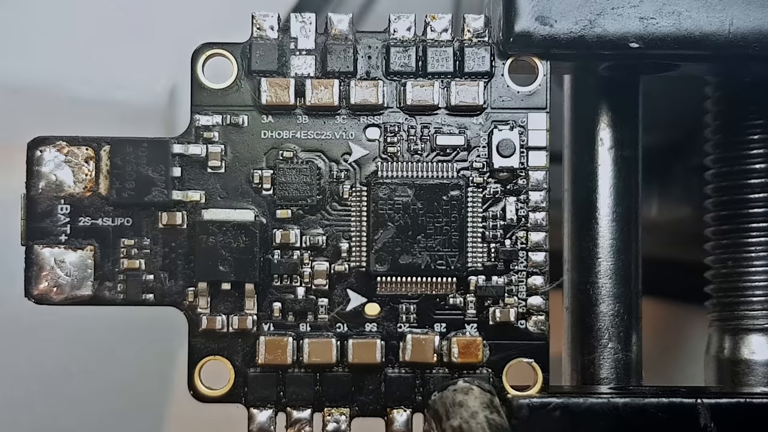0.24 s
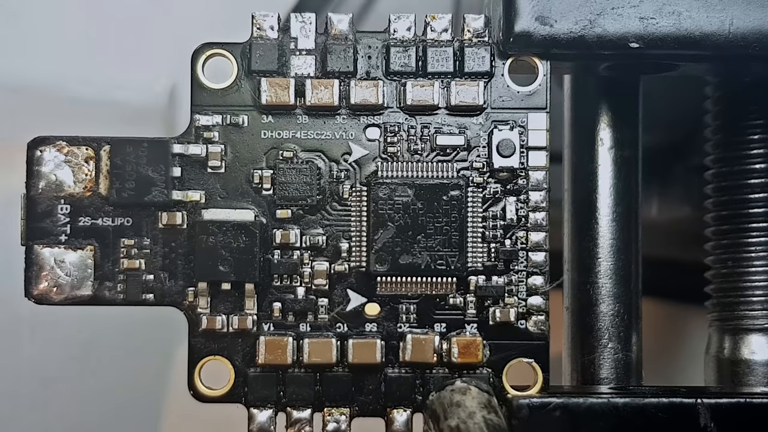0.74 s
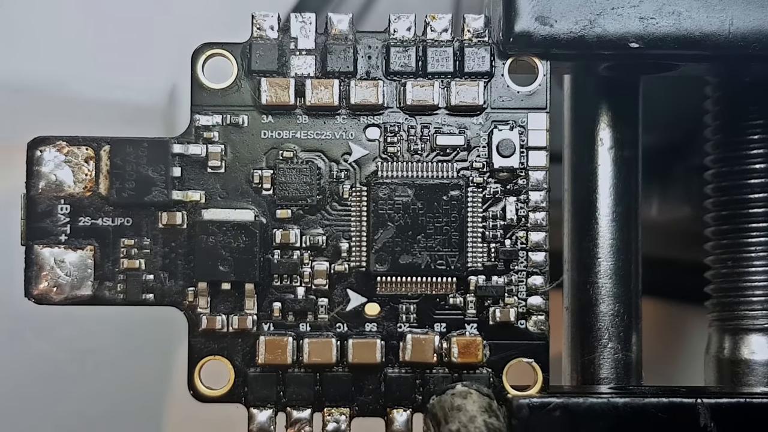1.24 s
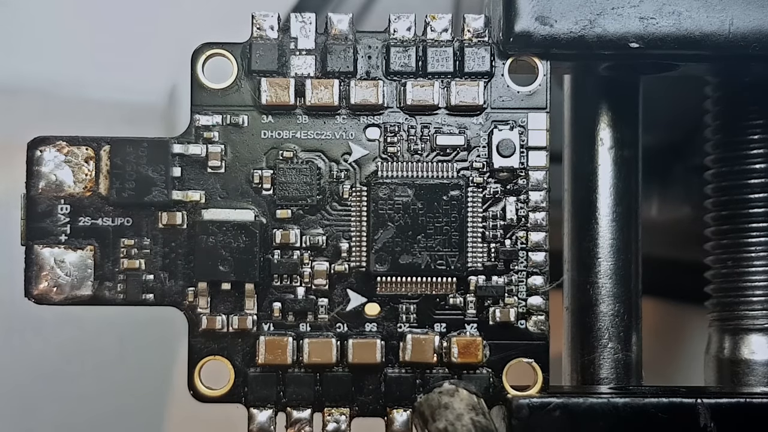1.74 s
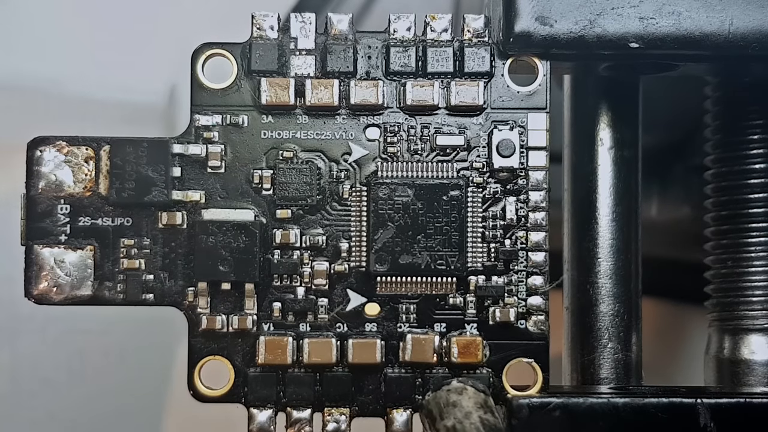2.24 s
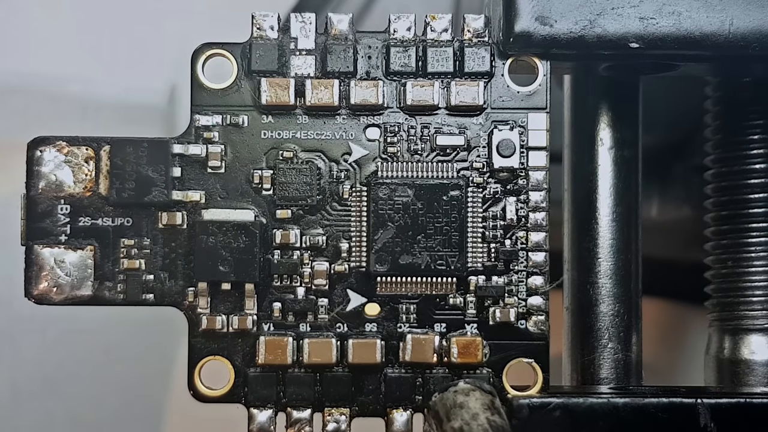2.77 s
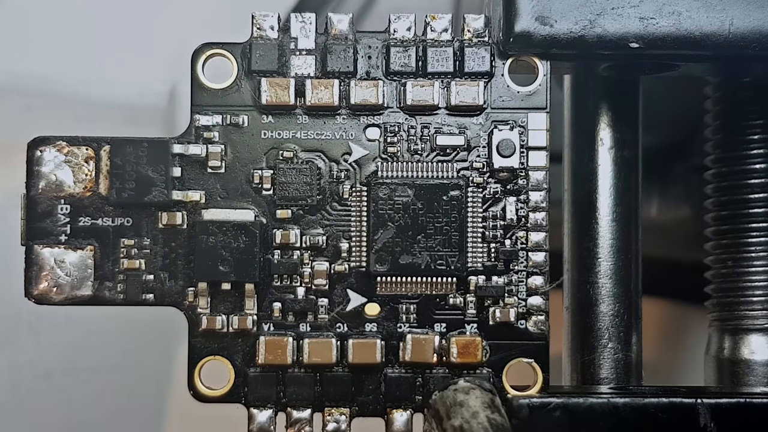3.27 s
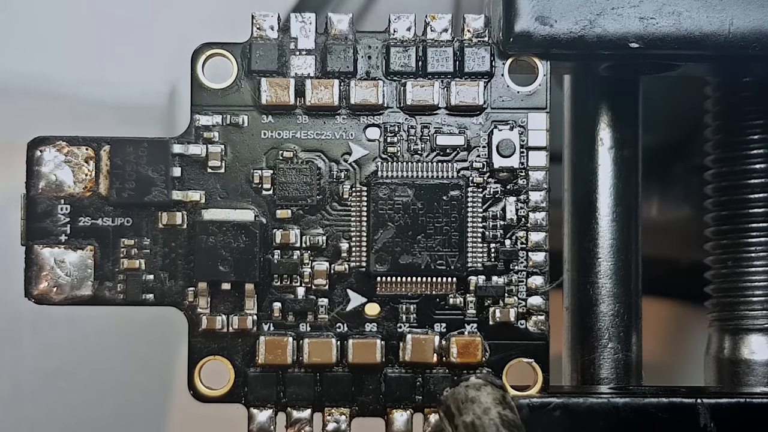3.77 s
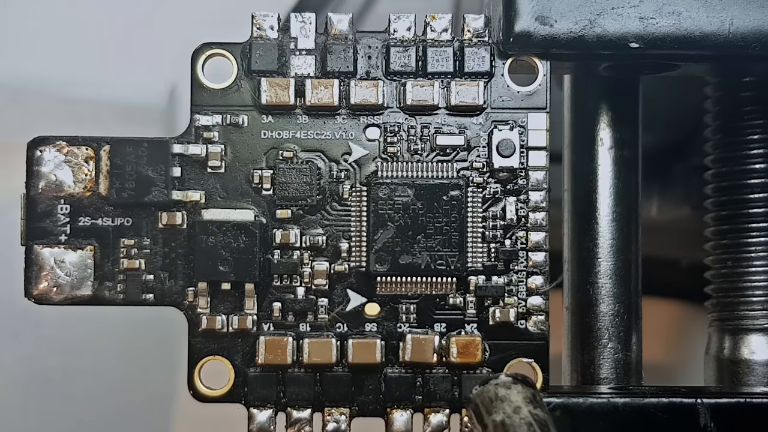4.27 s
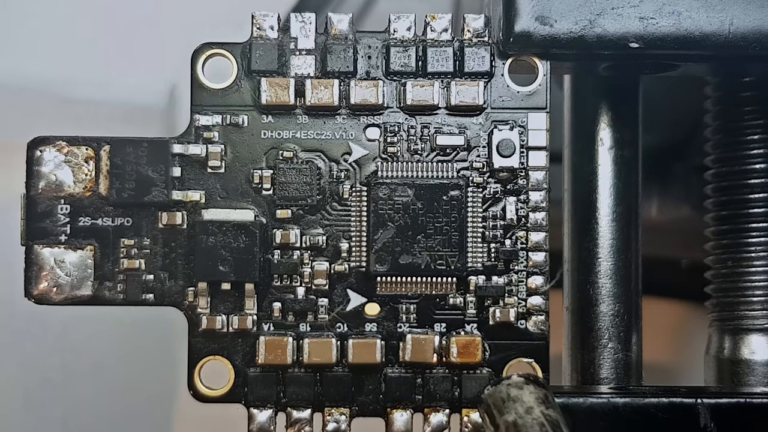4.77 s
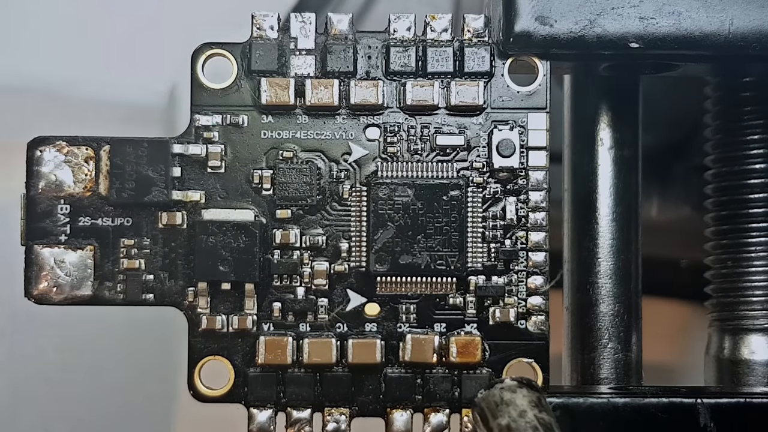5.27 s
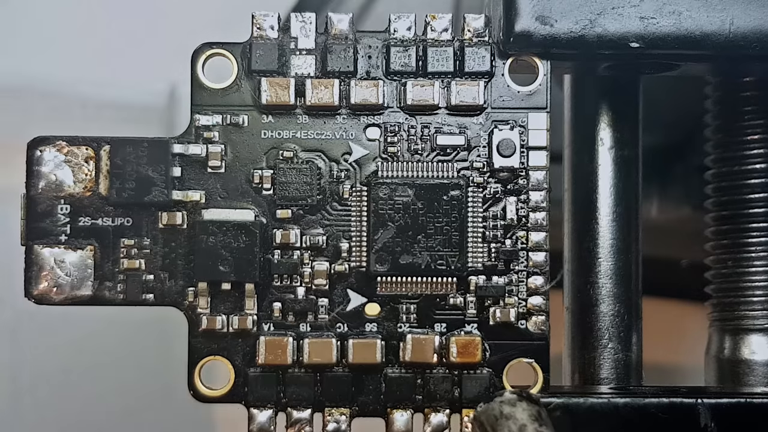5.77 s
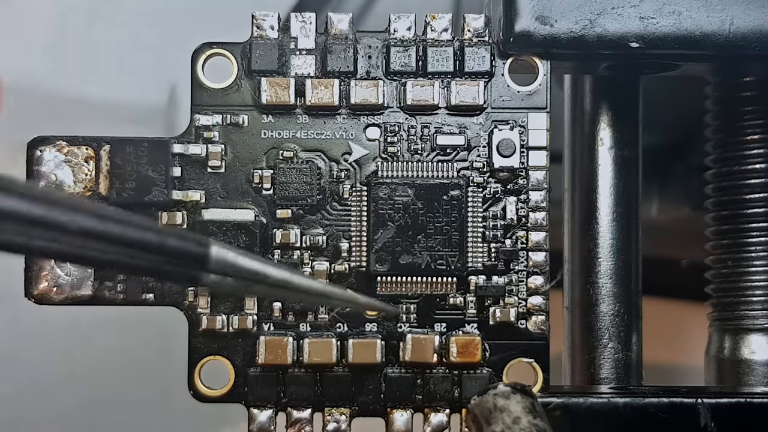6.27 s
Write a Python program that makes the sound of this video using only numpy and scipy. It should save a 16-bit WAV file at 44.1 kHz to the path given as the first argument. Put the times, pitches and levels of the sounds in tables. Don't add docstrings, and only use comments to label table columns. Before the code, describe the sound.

Close, continuous rush of hot air with a faint singing edge and low mains hum, drifting slightly, then a dull bench bump and brighter hiss.

```python
import sys
import numpy as np
from scipy import signal
from scipy.fft import rfft, irfft, next_fast_len
from scipy.io import wavfile
from scipy.ndimage import uniform_filter1d

SR = 44100
rng = np.random.default_rng(int(sys.argv[2]) if len(sys.argv) > 2 else 0)


def attenuation_scalar(level_db):
    decades = np.asarray(level_db, float) / 20
    return 10 ** decades


def master_out(mix):
    frames = np.transpose(np.atleast_2d(mix))
    ceiling = np.clip(frames, -1, 1)
    pcm = np.round(ceiling * 32767).astype(np.int16)
    wavfile.write(sys.argv[1], SR, pcm)


N = 287091
TIME = np.arange(N) / SR
SIZE = next_fast_len(N)
HZ = np.maximum(np.arange(SIZE // 2 + 1) * SR / SIZE, 1)
MAINS_HZ, STROKE_S = 49.963, -.00341


def walk(rate_hz):
    hold = int(SR / rate_hz)
    steps = np.repeat(rng.standard_normal(N // hold + 1), hold)
    slewed = uniform_filter1d(uniform_filter1d(steps, hold), hold)
    return 1.48 * slewed[:N]


def along(hz, values):
    return np.interp(np.log(HZ), np.log(hz), values)


def delay(ms):
    return np.exp(-2j * np.pi * HZ * ms / 1000)


# (t/s, ring f/Hz, peak level/dB, t60/s)
KNOCKS = [
    (5.825, 116, -33.5, 0.11),
]


def bump():
    out = np.zeros(N)
    for start_s, ring_hz, peak_db, t60_s in KNOCKS:
        age = np.maximum(TIME - start_s, 0)
        fade = np.log(1000) * age / t60_s
        envelope = fade * np.exp(1 - fade)
        out -= attenuation_scalar(peak_db) * np.sin(2 * np.pi * ring_hz * age) * envelope
    return out


# (multiple of mains, left level/dB, right level/dB, right lag/ms, sign)
PUMP_HUM = [(1, -62, -56, -2, 1), (2, -32.6, -32, .7, -1), (3, -37.7, -33.2, -.2, -1),
            (4, -42.5, -45.6, -.1, 1), (5, -56, -54, .7, 1), (6, -52, -53.5, .2, -1), (8, -61, -63, 0, 1),
            (13, -66, -60, -.45, 1), (16, -62, -53.5, -.27, 1)]


def hum():
    beat_hz, beat_top_s, beat_depth = .5, 3.2, .45
    lead_rad, sway_rad = .9, .3
    swell = np.cos(2 * np.pi * beat_hz * (TIME - beat_top_s))
    out = np.zeros((2, N))
    for multiple, left_db, right_db, lag_ms, sign in PUMP_HUM:
        lag_s = np.array([[0], [lag_ms / 1000]])
        beats = multiple == 4
        lead = beats * (lead_rad + sway_rad * swell)
        wave = np.cos(2 * np.pi * multiple * MAINS_HZ * (TIME - STROKE_S - lag_s) + lead)
        beat = 1 + beats * beat_depth * swell
        level_db = np.array([[left_db], [right_db]]) + 0.43 * walk(5.6)
        out += sign * np.sqrt(2) * attenuation_scalar(level_db) * beat * wave
    return out


# (f/Hz, share 0-1)
SHARED_HISS = [(25, .45), (40, .65), (80, .93), (400, .9), (1000, .8), (2000, .66), (6000, .66),
               (8300, .64), (10000, .5), (15000, .36)]
# (f/Hz, phase/rad)
PORT_LEAD = [(0, 0.5), (780, -0.0), (2670, 1.88), (3100, 1.16), (3450, 2.5), (4390, 2), (5680, 2.5),
             (6550, 3.5), (8350, 3.5), (9820, 4.5), (11500, 7.5), (11800, 6), (12700, 7.5), (15200, 7.5)]


def turbulence():
    direct, *diffuse = rfft(rng.standard_normal((3, SIZE)))
    alike = np.clip(along(*np.transpose(SHARED_HISS)), 0, 1)
    late = np.exp(-1j * np.interp(HZ, *np.transpose(PORT_LEAD)))
    from_jet = np.sqrt(alike) * direct * np.array([delay(0), late])
    from_room = np.sqrt(1 - alike) * np.array(diffuse)
    return from_jet + from_room


# (f/Hz, width/Hz, left level/dB, right level/dB)
HAND_BANDS = [(1380, 1100, -41, -43.5), (10700, 590, -55, -66)]
# (t/s, nearness 0-1)
HAND_NEARNESS = [
    (5.75, 0.14),
    (6.1, 1),
    (6.51, 0.65),
]


def hand():
    out, hiss = 0, turbulence()
    for hz, width_hz, *level_db in HAND_BANDS:
        band = irfft(hiss * np.exp(-((HZ - hz) / width_hz) ** 2), SIZE)[:, :N]
        out = out + attenuation_scalar(np.array(level_db))[:, None] * band / band.std()
    nearness = np.clip(np.interp(TIME, *np.transpose(HAND_NEARNESS)), 0, 1)
    return out * nearness


# (delay/ms, left gain, right gain)
BENCH_ECHOES = [(0.828, -0.021, 0.042), (1.111, -0.0051, -0.088), (1.474, -0.035, 0.083),
                (1.701, -0.0019, -0.1), (1.893, -0.077, 0.017), (2.109, 0.031, 0.044),
                (2.302, -0.019, -0.0022), (2.585, -0.02, -0.0022), (3.039, 0.021, -0.019),
                (3.889, 0.056, 0.048), (4.048, 0.024, -0.074), (5.011, 0.059, 0.051), (5.249, 0.046, 0.18),
                (5.51, 0.04, 0.026)]


def reflections():
    scatter_db, scatter_t60_s = -17.5, 0.12
    echo = sum(np.array(gains)[:, None] * delay(ms) for ms, *gains in BENCH_ECHOES)
    tail = np.exp(-np.log(1000) * TIME[:4096] / scatter_t60_s)
    scatter = rfft(rng.standard_normal((2, len(tail))) * tail / np.linalg.norm(tail), SIZE)
    reflects = along([1200, 3500, 8500, 11000], [0.52, 1.14, 1.4, .8])
    return 1 + reflects * (echo + attenuation_scalar(scatter_db) * scatter)


# (f/Hz, level/dB per Hz, left minus right/dB)
HOSE_RUSH = [(20, -81, -1), (35, -79, -1), (75, -72.5, -.5), (125, -70, 0), (175, -69.5, 1.5),
             (230, -66, 2), (330, -67, 1), (480, -71.5, 0), (600, -71, 0), (780, -68.5, 1), (1000, -69, .5),
             (1150, -72, 0), (1380, -69.5, 1.5), (1650, -72, -1)]
# (f/Hz, level/dB per Hz, left minus right/dB)
BOARD_JET = [(2360, -68.5, 2), (3260, -71.5, 1.5), (3470, -73.5, 0), (4470, -75.5, 0.5), (4820, -80, 6),
             (5700, -75.5, -2), (6100, -79.5, -1.5), (6880, -77, 1.5), (8030, -81.5, -2),
             (9600, -83.5, 3.5), (11250, -82.5, -2), (11640, -77.5, 2.5), (12300, -80, 3.5),
             (15700, -84, -1)]
# (f/Hz, width/Hz, left lift/dB, right lift/dB)
BOARD_CAVITIES = [(1870, 80, 2, 4), (2008, 100, 7.5, 3.5), (2250, 60, 2, 2), (2870, 250, 2, 0),
                  (3070, 120, 1, 1.5)]


def colour(depth):
    knee_hz = np.array([[8500], [8620]])
    knee_width_hz, knee_db = 280, -6.5
    hz, db, pan_db = np.transpose(list(HOSE_RUSH) + list(BOARD_JET))
    side = np.array([[.5], [-.5]])
    total_db = along(hz, db) + side * along(hz, pan_db)
    total_db += knee_db * (1 + np.tanh((HZ - knee_hz) / knee_width_hz)) / 2
    for centre_hz, width_hz, *lift_db in BOARD_CAVITIES:
        resonance = 1 / (1 + (2 * (HZ - centre_hz) / width_hz) ** 2)
        total_db += depth * np.array(lift_db)[:, None] * resonance
    return attenuation_scalar(total_db) * np.sqrt(SR / 2)


# (t/s, jet level/dB)
NOZZLE_NEARNESS = [(0.0, -43.5), (0.12, -45), (0.42, -41.5), (0.47, -42.5), (0.67, -41.5), (1.58, -46),
                   (2.3, -42.5), (3.39, -45.5), (3.83, -43), (4.97, -45.5), (5.06, -47), (6.51, -44.5)]
# (from t/s, to t/s, squareness of aim/dB)
CAVITY_DWELLS = [
    (-.2, 1.68, 2.5),
    (2.1, 4.2, 3.5),
    (5.75, 6.8, 1.5),
]
# (t/s, length/s, swell level/dB)
SLEEVE_RUSTLES = [
    (4.2, .15, 1.5),
    (4.83, 0.18, 1.5),
    (6.2, 0.31, 4),
]


def moves():
    slide_s = 0.13
    near = np.interp(TIME, *np.transpose(NOZZLE_NEARNESS))
    aim = 0
    for from_s, to_s, square_db in CAVITY_DWELLS:
        arrives = np.tanh((TIME - from_s) / slide_s)
        leaves = np.tanh((TIME - to_s) / slide_s)
        aim = aim + square_db * (arrives - leaves) / 2
    rustle = sum(db * np.exp(-((TIME - s) / length_s) ** 2) for s, length_s, db in SLEEVE_RUSTLES)
    controls = (rustle, aim + 0.42 * near, 0.47 * near, near)
    return [control - control.mean() for control in controls]


# (f/Hz, number of the control, 4 = none)
CONTROL_ZONES = [(150, 4), (250, 0), (450, 0), (1000, 2), (1350, 2), (1700, 1), (2150, 1), (3500, 2),
                 (9500, 2), (11000, 3)]
# (t/s, change of lag between ports/us)
NOZZLE_SWING = [
    (0, 5),
    (3.3, 5),
    (4.5, -6),
    (6.51, -5),
]


def air(stroke_db, twice_db, puff_s, flutter_db, flicker_db):
    ports = turbulence() * reflections()
    plain = colour(0)
    ringing = colour(0.91) - plain
    hand_db = moves()
    sing = np.clip(1 + .17 * hand_db[1], 0, 2)
    turn = 2 * np.pi * MAINS_HZ * (TIME - STROKE_S - puff_s)
    pump_db = stroke_db * np.cos(turn) + twice_db * np.cos(2 * turn)
    flutter = flutter_db * walk(24.92)
    zone_hz, zone = np.transpose(CONTROL_ZONES)
    edges = np.log(np.r_[1, 250 * 2 ** np.arange(0, 6.4, 1 / 3)])
    out = np.zeros((2, N))
    for k, edge in enumerate(edges):
        band = ports * np.interp(np.log(HZ), edges, np.arange(len(edges)) == k)
        weight = [np.interp(edge, np.log(zone_hz), zone == j) for j in range(len(hand_db))]
        fine = np.clip((edge - np.log(300)) / np.log(40), 0, 1)
        level_db = np.dot(weight, hand_db) + fine * (pump_db + flutter) + flicker_db * walk(9)
        sound = irfft(band * plain, SIZE)[:, :N]
        if weight[1] > 0:
            sound += sing * irfft(band * ringing, SIZE)[:, :N]
        out += attenuation_scalar(level_db) * sound
    slope = irfft(rfft(out[1], SIZE) * 2j * np.pi * HZ, SIZE)[:N]
    lag_s = np.interp(TIME, *np.transpose(NOZZLE_SWING)) * 1e-6
    out[1] -= lag_s * slope
    return out


def scene():
    blown = air(stroke_db=0.4, twice_db=1.4, puff_s=0.0016, flutter_db=0.5, flicker_db=.5)
    return bump() + hum() + hand() + blown


def top_cut(x):
    return signal.sosfilt(signal.butter(12, 15730, fs=SR, output="sos"), x)


def record(dry):
    mix = dry - .0011
    return top_cut(mix)


dry = scene()
out = record(dry)
master_out(out)
```